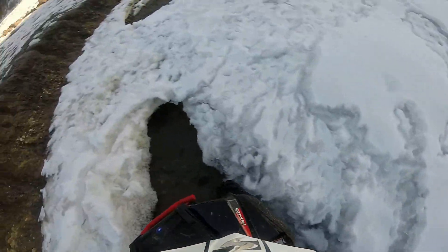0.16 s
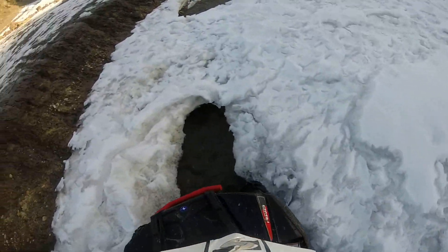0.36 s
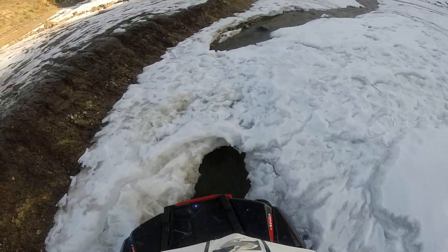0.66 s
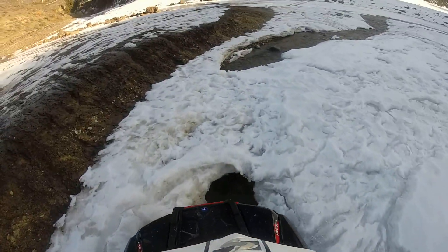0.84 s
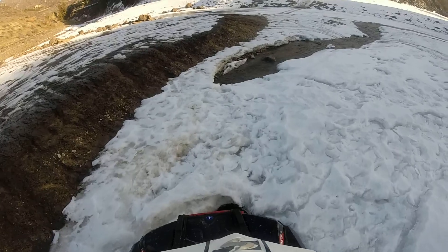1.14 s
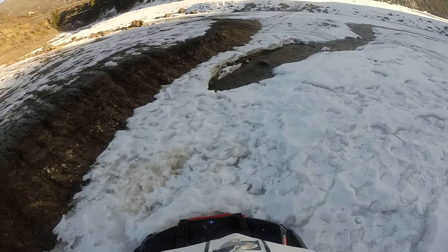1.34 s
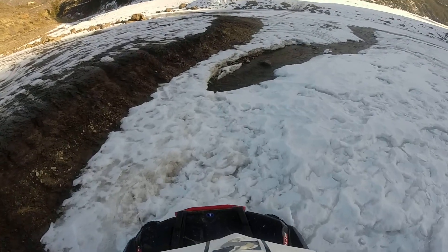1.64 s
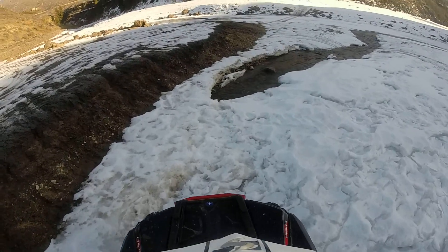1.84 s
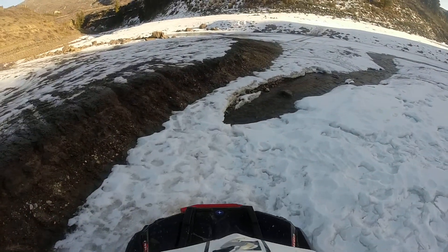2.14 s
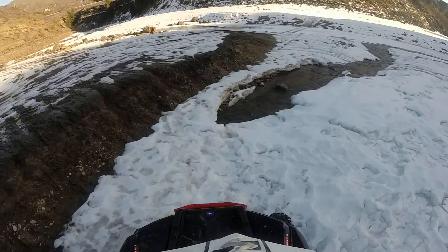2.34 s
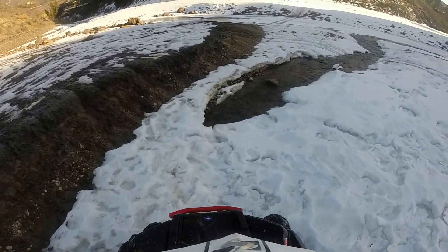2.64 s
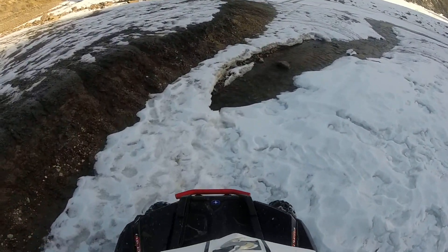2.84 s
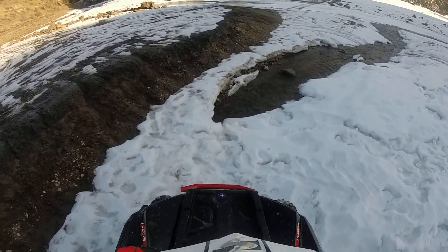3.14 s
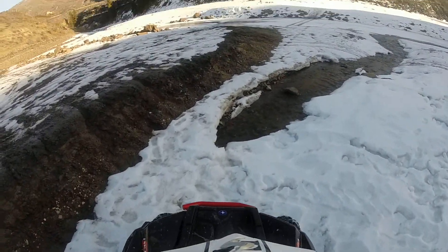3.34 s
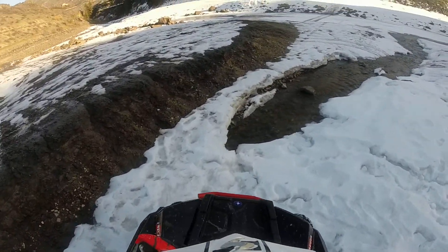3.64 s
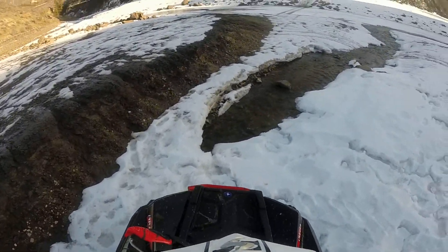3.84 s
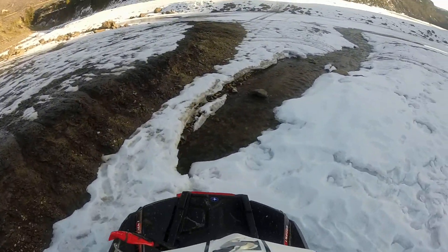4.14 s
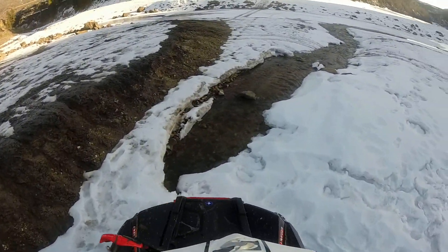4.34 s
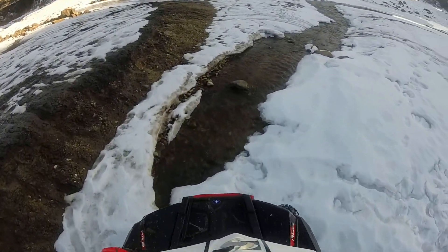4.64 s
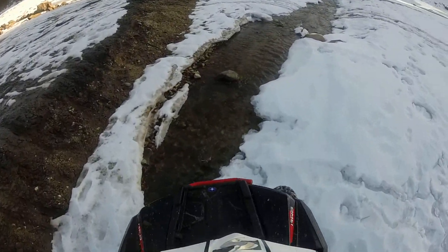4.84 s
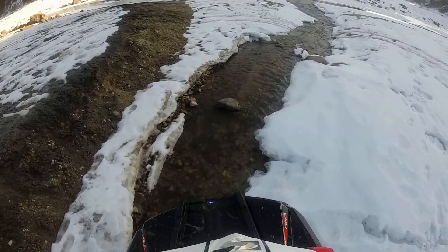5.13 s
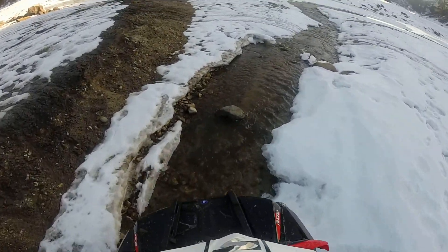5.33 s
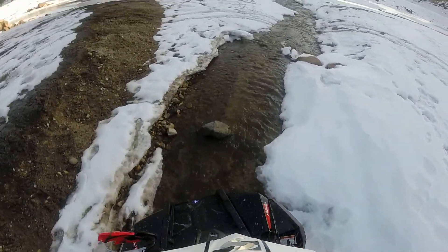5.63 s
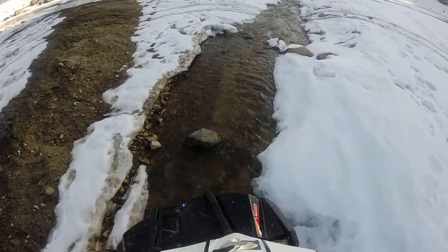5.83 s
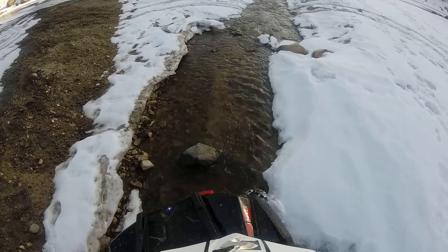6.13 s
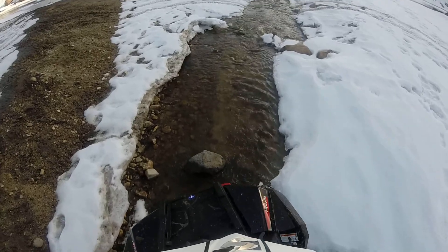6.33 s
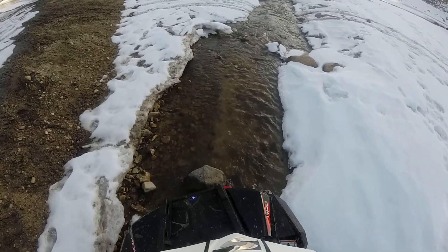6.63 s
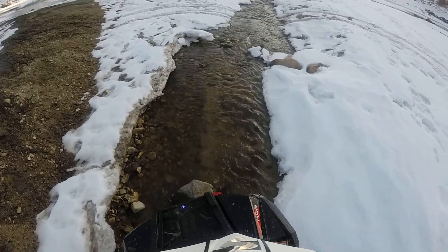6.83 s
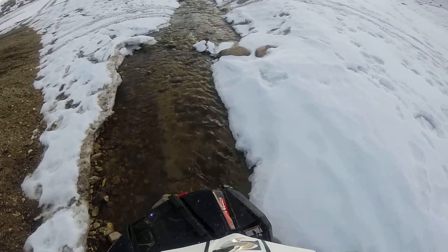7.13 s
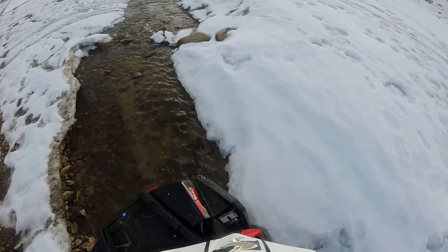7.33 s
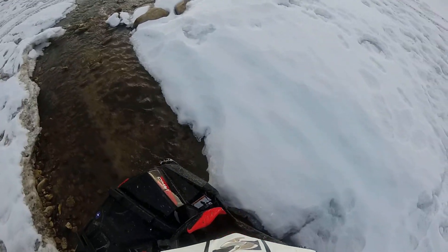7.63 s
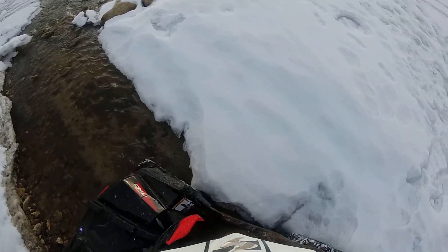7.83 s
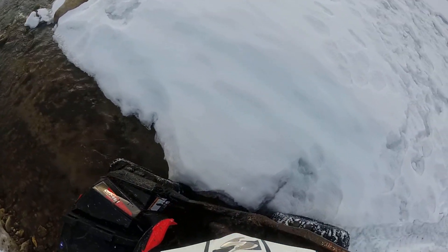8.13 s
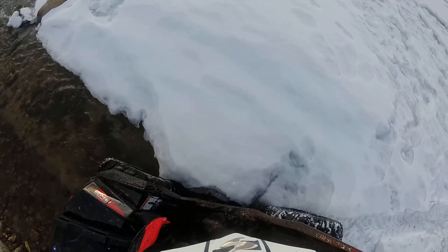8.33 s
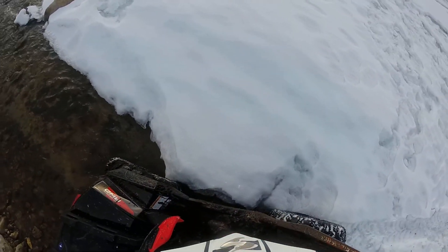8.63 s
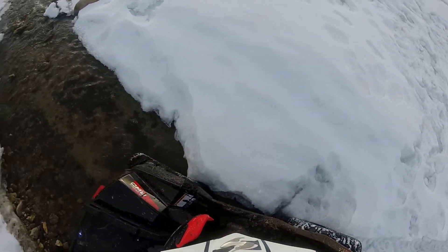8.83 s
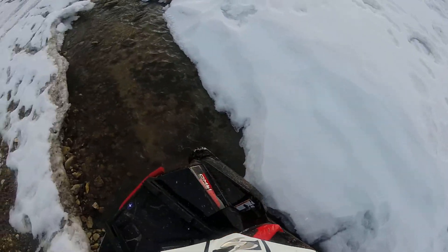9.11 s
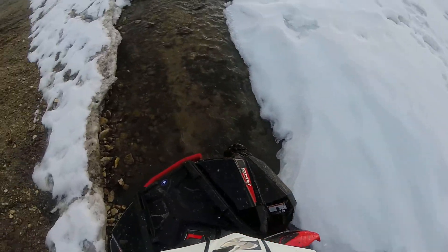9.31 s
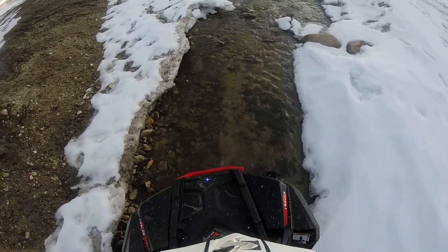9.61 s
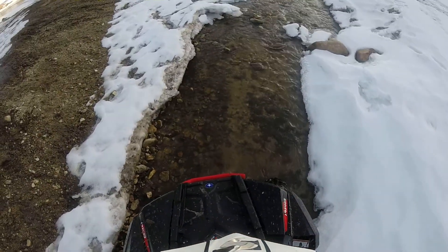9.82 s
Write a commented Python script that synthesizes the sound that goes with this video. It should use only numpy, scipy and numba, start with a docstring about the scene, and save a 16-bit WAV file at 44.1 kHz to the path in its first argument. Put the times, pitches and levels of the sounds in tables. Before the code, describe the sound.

An uneven twin-cylinder quad bike is heard close up through a closed housing, outdoors without echo. Its low growl surges three times, with throbbing hiss and a thin wavering belt whine. Dry ice cracks and small splashes break through. Midway the throttle shuts, dull pops sputter in the exhaust, and it settles to slow chugging. Late, it thumps harder, revs a little and sinks again with brief scrapes and a rattle.

```python
"""The uneven exhaust of a V-twin quad bike is heard first: it surges, idles and speeds up again in an icy creek.
The single microphone is close, on the rider, in a closed housing; each cycle's two firings ring the exhaust.
Gas and valve gear hiss in step, the drive belt sings as a narrow wandering resonance, and fuel pops in the pipe.
Ice cracks ring the housing, water splashes as grainy noise, and slow wind pressure rumbles behind.
Near the end come broad scrapes, made like the splashes, and a short rattle, made like the cracks."""
import sys
import numpy as np
from scipy import signal
from scipy.fft import rfft, irfft
from scipy.io import wavfile
from scipy.ndimage import uniform_filter1d
from numba import njit

SR = 44100
rng = np.random.default_rng(int(sys.argv[2]) if len(sys.argv) > 2 else 0)


def master_out(mix):
    """Clip the mix to full scale and print it as 16-bit PCM to the path in sys.argv[1]."""
    frames = np.transpose(np.atleast_2d(mix))
    ceiling = np.clip(frames, -1, 1)
    pcm = np.round(ceiling * 32767).astype(np.int16)
    wavfile.write(sys.argv[1], SR, pcm)


N = 439677

# Engine speed. Columns: time_s, rate_hz (engine cycles per second)
ENGINE_SPEED = [(0.0, 18.1), (.14, 18.7), (0.3, 18.6), (.53, 21.6), (0.58, 21.9), (.77, 20.4), (.94, 18.8),
                (1.22, 15.7), (1.33, 17.1), (1.55, 22.6), (1.75, 26.5), (1.83, 26.3), (2.17, 21.1),
                (2.44, 19.8), (2.64, 20.6), (2.89, 25.0), (3.19, 28.8), (3.36, 30.7), (3.78, 26.5),
                (3.88, 27), (4.11, 29.3), (4.22, 30.0), (4.55, 29.8), (4.72, 27.5), (4.89, 24),
                (5.08, 21.4), (5.44, 14.1), (5.77, 11.02), (6.19, 9.95), (8.04, 9.83), (8.59, 12.08),
                (9.18, 17.47), (9.97, 13.55)]
# Exhaust levels. Columns: time_s, ring_db, bark_db
EXHAUST_LEVELS = [(0.0, -38, -46.5), (0.22, -41.5, -53), (0.61, -38.5, -48.5), (1.14, -42, -50),
                  (1.28, -39.5, -51), (1.58, -33.5, -45), (2.33, -40, -50.5), (2.89, -35.5, -48),
                  (3.19, -37.5, -47.5), (3.36, -33, -47.5), (3.75, -37.5, -49), (4.44, -33, -45.5),
                  (5.05, -38.5, -57.5), (5.13, -50.5, -57), (5.3, -45, -57.5), (5.45, -48.5, -57),
                  (5.75, -47.5, -56), (6.0, -46.5, -57), (7.11, -45, -62), (7.9, -48, -61),
                  (8.05, -49.5, -59), (8.4, -44.5, -57), (8.86, -41, -54), (9.22, -40, -56),
                  (9.94, -47, -56.5), (9.97, -53, -59)]
# Low exhaust and frame boom, before a random sway. Columns: time_s, level_db
BOOM_LEVEL = [(0, -36.5), (.6, -37), (1.2, -45), (1.35, -34.5), (1.8, -38.5), (3.6, -42), (4.6, -48),
              (5.5, -43.5), (6.3, -42.5), (6.5, -48), (6.75, -41), (7.7, -45.5), (8.1, -40), (9.1, -36.5),
              (9.97, -47.5)]
# Exhaust tone between boom and ring, before GRUNT_TRIM_DB. Columns: time_s, level_db
GRUNT_LEVEL = [(0.0, -41.5), (0.53, -46.5), (2.69, -39.5), (2.86, -50), (4.14, -44), (4.55, -53),
               (4.91, -49), (5.19, -48), (5.33, -42), (5.38, -60), (5.64, -46), (5.72, -60), (6.0, -48),
               (6.13, -60), (6.22, -49), (6.41, -58.5), (7.53, -54.5), (9.5, -46.5), (9.91, -49),
               (9.97, -56)]
# How the engine fires. Columns: time_s, crispness (0-1), tonal_share (exhaust tone in the boom's power, 0-1)
FIRING_CHARACTER = [(0, .45, .55), (.5, .35, .55), (.9, .2, .5), (1.4, .45, .5), (1.8, .25, .5),
                    (2.7, .4, .5), (3, .2, .5), (5.1, .2, .45), (5.4, .25, .45), (6.3, .2, .7),
                    (7.95, .2, .72), (8.1, 1, .94), (8.7, 1, .94), (9.2, .8, .94), (9.5, .4, .8),
                    (9.97, .3, .7)]
# Brief exhaust dips as the engine misses a beat. Columns: centre_s, dip_db
MISSED_BEATS = [(5.19, -2), (5.77, -2), (7.97, -5)]

# Exhaust tone pulling at about 16, 20, 26 and 30 cycles per second.
# Columns: multiple (of the cycle rate), level_db
PULL_AT_16 = [(1, -18.0), (2, -18.0), (3, 0.0), (4, -29.0), (5, -6.0), (6, -14.0), (7, -19.0), (8, -29.0),
              (9, -30.0), (10, -7.0), (11, -8.0), (12, -25.0), (13, -30.0), (14, -19.0), (15, -16.0),
              (16, -34.0), (17, -36.0), (18, -38.0), (19, -22.0), (20, -26.0), (21, -34.0), (22, -26.0),
              (23, -30.0), (24, -32.0), (25, -42.0), (26, -34.0)]
PULL_AT_20 = [(1, -15.0), (2, -3.0), (3, -14.0), (4, -12.0), (5, 0.0), (6, -9.0), (7, -20.0), (8, -1.0),
              (9, -11.0), (10, -7.0), (11, -14.0), (12, -9.0), (13, -5.0), (14, -19.0), (15, -18.0),
              (16, -14.0), (17, -33.0), (18, -15.0), (19, -27.0), (20, -21.0), (21, -18.0), (22, -21.0),
              (23, -26.0), (24, -25.0)]
PULL_AT_26 = [(1, -12.0), (2, -3.0), (3, -6.0), (4, -14.0), (5, -5.0), (6, -3.0), (7, 0.0), (8, -1.0),
              (9, -6.0), (10, -5.0), (11, -10.0), (12, -16.0), (13, -18.0), (14, -19.0), (15, -21.0),
              (16, -12.0), (17, -16.0), (18, -14.0), (19, -35.0), (20, -17.0), (21, -14.0), (22, -21.0)]
PULL_AT_30 = [(1, -23.0), (2, -11.0), (3, -10.0), (4, -28.0), (5, 0.0), (6, -1.0), (7, -3.0), (8, -17.0),
              (9, -15.0), (10, -15.0), (11, -11.0), (12, -19.0), (13, -20.0), (14, -19.0), (15, -21.0),
              (16, -19.0), (17, -21.0), (18, -22.0), (19, -19.0), (20, -28.0), (21, -22.0), (22, -29.0)]
# Exhaust tone idling near 10, reversing near 12 and 17 cycles per second.
# Columns: multiple (of the cycle rate), level_db
IDLE_AT_10 = [(1, -4.0), (2, -19.0), (3, 0.0), (4, -23.0), (5, -3.0), (6, -31.0), (7, -21.0), (8, -11.0),
              (9, -23.0), (10, -31.0), (11, -25.0), (12, -40.0), (13, -15.0), (14, -8.0), (15, -16.0),
              (16, -4.0), (17, -34.0), (18, -17.0), (19, -16.0), (20, -34.0), (21, -14.0), (22, -19.0),
              (23, -30.0), (24, -31.0), (25, -45.0), (26, -39.0), (27, -35.0), (28, -46.0), (29, -39.0),
              (30, -41.0)]
REVERSE_AT_12 = [(1, -15.0), (2, -10.0), (3, 0.0), (4, -16.0), (5, -9.0), (6, -19.0), (7, -23.0),
                 (8, -13.0), (9, -25.0), (10, -24.0), (11, -17.0), (12, -31.0), (13, -11.0), (14, -16.0),
                 (15, -21.0), (16, -37.0), (17, -34.0), (18, -17.0), (19, -23.0), (20, -35.0), (21, -24.0),
                 (22, -26.0), (23, -28.0), (24, -17.0), (25, -25.0), (26, -25.0), (27, -23.0), (28, -49.0),
                 (29, -28.0), (30, -32.0)]
REVERSE_AT_17 = [(1, -17.0), (2, -8.0), (3, 0.0), (4, -24.0), (5, -9.0), (6, -19.0), (7, -29.0), (8, -12.0),
                 (9, -17.0), (10, -9.0), (11, -11.0), (12, -32.0), (13, -18.0), (14, -20.0), (15, -23.0),
                 (16, -23.0), (17, -40.0), (18, -15.0), (19, -22.0), (20, -30.0), (21, -28.0), (22, -44.0),
                 (23, -33.0), (24, -46.0), (25, -48.0), (26, -39.0), (27, -35.0), (28, -49.0), (29, -46.0),
                 (30, -52.0)]

# Exhaust bark resonances. Columns: centre_hz, width_hz, level_db
BARK_MODES = [(284, 88, -1), (411, 113, 0), (557, 127, -0.5), (780, 136, -3.5)]
# Pipe modes rung by hard firings at low speed. Columns: pitch_hz, level_db, t60_s
PIPE_MODES = [(150, 0, .13), (208, -4, .09), (280, -1, .09), (335, -9, .07), (530, -17, .05)]
# Frame resonances. Columns: centre_hz, width_hz, level_db
FRAME_MODES = [(31.3, 12.2, -5.5), (50.8, 12.3, 0.5)]
# Low exhaust rumble. Columns: centre_hz, width_hz, level_db
RUMBLE_MODES = [(85, 61, -9), (196, 89, 1)]
# Overrun pops in the pipe. Columns: start_s, peak_db, pitch_hz
PIPE_POPS = [(5.205, -42, 180), (5.266, -44, 549), (5.29, -39, 189), (5.324, -39.5, 400), (5.438, -41, 476),
             (5.53, -42, 479), (5.545, -45, 160), (5.637, -35.5, 700), (5.644, -39, 500), (5.645, -40, 170),
             (5.709, -39, 170), (5.825, -40, 169), (5.924, -48, 300), (6.088, -50, 304), (6.391, -43, 336)]

# Hiss levels, before flicker and throb. Columns: time_s, machinery_db, chatter_db, top_db
HISS_LEVELS = [(0.0, -44, -46, -55.5), (0.14, -49.5, -52.5, -65), (0.36, -48, -53, -58),
               (0.64, -43.5, -44.5, -54.5), (1.08, -47, -49.5, -58), (1.33, -46.5, -50, -59),
               (1.58, -42, -48.5, -55), (1.86, -41, -46, -56.5), (2.03, -43, -50, -59),
               (2.25, -46, -54, -60.5), (3.25, -41, -48.5, -59.5), (3.72, -43, -51, -60.5),
               (4.36, -41.5, -48, -59), (4.91, -45.5, -52.5, -61.5), (5.14, -50, -55.5, -66.5),
               (5.55, -51, -55.5, -62.5), (5.77, -52.5, -57.5, -69), (6.4, -54.5, -59.5, -71),
               (7.08, -55, -60.5, -71.5), (8.02, -54, -57.5, -71.5), (8.8, -49.5, -51, -65),
               (9.05, -49, -50.5, -67), (9.97, -52.5, -59.5, -70)]
# Treble let in by the housing, widths before BAND_WIDENING. Columns: centre_hz, width_hz, level_db
HOUSING_MODES = [(1070, 118, -10), (1428, 80, -11), (1652, 275, -5), (1848, 77, -8), (2162, 114, -1),
                 (2404, 79, -0.5), (2860, 446, -10), (3430, 150, -15)]
# Valve gear, widths before BAND_WIDENING. Columns: centre_hz, width_hz, level_db
VALVE_MODES = [(4265, 320, 5.5), (4800, 510, -2.5), (5570, 490, -5)]
# Colour of the highest treble. Columns: frequency_hz, density_db (level per Hz)
TOP_COLOUR = [(5000, -30), (6000, 0), (7200, -5), (8400, -14), (10500, -13), (12000, -19), (15300, -21)]
# Drive belt song, before a random sway. Columns: time_s, level_db, pitch_hz
BELT_SONG = [(0, -77, 1546), (0.44, -57, 1555), (0.5, -54, 1540), (0.89, -45, 1558), (1.05, -51, 1548),
             (1.22, -60, 1526), (1.55, -47.5, 1540), (1.68, -35.5, 1555), (1.75, -46, 1555),
             (1.9, -48, 1585), (2.0, -38, 1565), (2.11, -47.5, 1560), (2.24, -50, 1553),
             (2.28, -48.5, 1550), (2.56, -54.5, 1555), (2.9, -58, 1557), (2.98, -42, 1560),
             (3.44, -48.5, 1566), (3.5, -37.5, 1558), (3.55, -46.5, 1554), (3.72, -44, 1582),
             (3.9, -49, 1551), (4.02, -41, 1568), (4.4, -35, 1567), (4.69, -35, 1584), (4.85, -46, 1573),
             (5.02, -46.5, 1560), (5.12, -44, 1562), (5.18, -49, 1580), (5.27, -56.5, 1574),
             (5.33, -68, 1580), (6.1, -80, 1570)]

# Ice cracks, and a short rattle at the end (last three rows).
# Columns: start_s, peak_db, thud_db, snap_db (thud and snap relative to the crack)
CRACKS_AND_RATTLE = [(0.4777, -34, -6, -20), (0.551, -41, -13, -20), (1.8295, -21.5, -25, -20),
                     (1.915, -28, -24, -20), (2.519, -20, -13.5, -11), (3.559, -23.5, -21, -13),
                     (4.0742, -29, -21, -18), (6.5162, -22.5, -18, -14), (7.645, -32.5, -11, -24),
                     (7.908, -25.5, -16, -24), (9.3124, -26, -17, -12), (9.845, -41, -18, -20),
                     (9.903, -32, -7, -20), (9.9244, -41, -14, -20)]
# Crack resonances, each passed twice. Columns: centre_hz, width_hz (of one pass), level_db
ICE_MODES = [(2170, 600, 0), (3300, 600, -12)]
# Splashes, and broad scrapes near the end (9.797 and 9.889 s).
# Columns: start_s, peak_db (of the envelope), top_db (relative to the peak), fade_s (to -60 dB)
SPLASHES_AND_SCRAPES = [(0.3482, -41, 4, 0.035), (0.4388, -31.5, -19, 0.081), (1.3886, -33, -17, 0.26),
                        (5.8994, -42, -22, 0.076), (6.215, -29.5, -16, 0.12), (6.2485, -40, -22, 0.08),
                        (6.2991, -44, -18, 0.13), (6.3894, -43.5, -20, 0.12), (7.3396, -39, -25, 0.071),
                        (9.3546, -35, -22, 0.064), (9.6085, -31.5, -29, 0.056), (9.634, -43, -22, 0.04),
                        (9.797, -30.5, -29, 0.054), (9.817, -46, -10, 0.04), (9.889, -32, -23, 0.052),
                        (9.916, -43, -27, 0.076)]
# Spray through the housing. Columns: centre_hz, width_hz, level_db
SPRAY_MODES = [(2170, 360, 3.5), (3370, 340, -3.5), (4570, 610, 0), (7340, 2400, -16)]
# Wind on the housing, before a random sway. Columns: time_s, level_db
WIND_LEVEL = [(0.0, -50), (0.5, -37), (2.33, -40.5), (2.66, -25.5), (2.75, -36.5), (3.33, -28),
              (5.08, -37.5), (6.33, -32.5), (6.38, -40), (9.27, -51), (9.36, -29), (9.97, -47.5)]

REAR_LAG, START_PHASE = 270 / 720, .39  # both in engine cycles
RELEASE_S, REOPEN_S = 5.25, 8.0  # the throttle shuts, then opens again
LOADED_S, LIGHT_RATE = 2.6, 21.5  # until the wheels bite, surges keep the tone of this speed (cycles per s)
IDLE_LATE_S = .019  # idling, the ring above 135 Hz leaves the silencer late
MISSED_BEAT_S = 0.056  # time constant of a dip
THUMP_DB, GRUNT_TRIM_DB = 0.5, -0.5  # thump relative to the exhaust ring; offset on the grunt level
STEP_DB, STEP_S = -4, .004  # pressure step beside the pipe modes, its fade constant
THROB_DB = 3.0  # throb scale per standard deviation of puff at full crispness; the hiss body swells by 0.75 and the top by 0.87 of it, in dB
BAND_WIDENING = 1.9  # widens each of two filter passes in the hiss
BELT_WIDTH_HZ = 42
CRACK_RING_S = .008  # fade to -60 dB of the noise striking the crack modes
TOP_HZ = 15250  # upper limit of the recorder


def undb(db):
    """Decibels to gain."""
    return 10 ** (np.asarray(db) / 20)


def unit(x):
    """Scale to rms 1."""
    return x / np.sqrt(np.mean(x ** 2))


def curves(table):
    """Columns of a timed table, one value per sample."""
    s, *columns = np.transpose(table)
    return [np.interp(np.arange(N) / SR, s, c) for c in columns]


def walk(rate):
    """Random levels every 1 / rate s, joined by lines; spread near 1."""
    knots = rng.standard_normal(int(N / SR * rate) + 2)
    return np.interp(np.arange(N) * (rate / SR), np.arange(len(knots)), knots)


@njit
def svf(x, hz, width):
    """State-variable band-pass, gain 1 at the centre."""
    y, band, low = np.empty(len(x)), 0., 0.
    g, k = np.tan(np.pi * hz / SR), width / hz
    for i in range(len(x)):
        v = (band + g * (x[i] - low)) / (1 + g * (g + k))
        band, low, y[i] = 2 * v - band, low + 2 * g * v, k * v
    return y


def svf_twice(x, hz, width, second_width):
    """Two band-passes in a row give steeper skirts."""
    return svf(svf(x, float(hz), float(width)), float(hz), float(second_width))


def resonate(x, modes):
    """Parallel resonances of alternating sign."""
    return sum((-1) ** k * undb(db) * svf(x, float(hz), float(w)) for k, (hz, w, db) in enumerate(modes))


def firings(cycles, scatter_db=1.0):
    """Pulses of both cylinders, and a gas envelope that swells at each firing and fades."""
    pulses = np.full(N, 1e-18)
    for lag in (0, REAR_LAG):
        cycle = np.arange(1, int(cycles[-1] - lag))
        at = np.interp(cycle + lag, cycles, np.arange(N)).astype(int)
        pulses[at] += undb(scatter_db * rng.standard_normal(400)[cycle])
    fade = np.exp(-1 / (.016 * SR))  # 16 ms time constant
    puff = uniform_filter1d(signal.lfilter([1], [1, -fade], pulses), SR // 250)
    return pulses, puff - uniform_filter1d(puff, SR // 5)


def exhaust(rate, cycles, pulses, puff):
    """Firings drive pipe tone, gas bark and thumps; frame drumming and a low exhaust rumble add noise."""
    ring_db, bark_db = curves(EXHAUST_LEVELS)
    boom_db = curves(BOOM_LEVEL)[0] + 1.5 * walk(5.7)
    grunt_db = curves(GRUNT_LEVEL)[0] + GRUNT_TRIM_DB
    crisp, tonal = curves(FIRING_CHARACTER)
    t = np.arange(N) / SR
    dip_db = sum(db * np.exp(-((t - s) / MISSED_BEAT_S) ** 2) for s, db in MISSED_BEATS)

    # the upper multiples follow the bark
    boom, grunt, ring = tone(rate, cycles, np.clip(bark_db - ring_db + 12, -10, 0))
    gas = unit(undb(4 * crisp * puff / puff.std()) * rng.standard_normal(N))
    kicks = unit((pulses - pulses.mean()) / np.sqrt(rate))
    bark = unit(resonate(.45 * crisp * kicks + (1 - .5 * crisp) * gas, BARK_MODES))

    hard = np.clip(4 * crisp - 3, 0, 1)  # only the crispest firings thump
    ring = np.sqrt(1 - hard) * ring + np.sqrt(hard) * undb(THUMP_DB) * thump(kicks)
    drum = unit(resonate(rng.standard_normal(N), FRAME_MODES))
    rumble = unit(resonate(rng.standard_normal(N), RUMBLE_MODES))
    ring = ring + undb(-15) * rumble
    low = undb(boom_db) * (np.sqrt(tonal) * boom + np.sqrt(1 - tonal) * drum)
    low = low + undb(grunt_db) * grunt
    return undb(dip_db) * (undb(ring_db) * ring + undb(bark_db) * bark + low)


def order_db(k, rate, speeds, tables):
    """Level of multiple k, read between the steady speeds."""
    levels = [t[k - 1][1] if k <= len(t) else -50 for t in tables]
    return np.interp(rate, speeds, levels)


def tone(rate, cycles, upper_db, step=32):
    """Multiples of the cycle rate, phased as firings three quarters of a turn apart: boom, grunt and ring."""
    rate, cycles = rate[::step], cycles[::step]
    t = np.arange(len(rate)) * step / SR
    after_release = np.clip((t - RELEASE_S) / 0.069, 0, 1)
    idle = after_release * np.clip(11.2 - rate, 0, 1)
    reversing = after_release - idle  # any speed above idle after the release
    closed = after_release * (t < REOPEN_S)
    early = t < LOADED_S
    upper_db = upper_db[::step] - 4 * early - 6 * closed  # light load dulls the upper multiples
    pull_rate = np.where(early, np.minimum(rate, LIGHT_RATE), rate)

    out, power = 0, 1e-12
    for k in range(1, 31):
        hz = k * rate
        pull = order_db(k, pull_rate, [16, 20, 26, 30], [PULL_AT_16, PULL_AT_20, PULL_AT_26, PULL_AT_30])
        later = order_db(k, rate, [9.9, 11.6, 17], [IDLE_AT_10, REVERSE_AT_12, REVERSE_AT_17])
        level_db = pull + after_release * (later - pull) + 1.2 * walk(9)[::step]
        size = undb(level_db + upper_db * np.clip(hz / 40 - 6.5 + closed, 0, 1))
        pair = np.angle(1 + np.exp(-2j * np.pi * k * REAR_LAG))
        # pressure steps up at each firing; the pipe rings on near 170 Hz, which arrives late
        lag = 4.3 + 2 * np.arctan((hz - 170) / 40)
        lag = lag + 2 * np.pi * IDLE_LATE_S * idle * np.maximum(hz - 135, 0)
        # above idle, the silencer adds its own ring near 195 Hz
        lag = lag + reversing * (np.pi + 2 * np.arctan((hz - 195) / 15))
        # crossovers: boom to grunt from 62 Hz, grunt to ring from 120 Hz
        high, higher = (np.clip((hz - edge) / 12, 0, 1) for edge in (62, 120))
        lag = lag - .5 * reversing * (1 - high)  # shifts the boom's peak against the step
        parts = size * np.array([1 - high, high - higher, higher])
        wander = .015 * k * walk(10)[::step]
        out = out + parts * np.cos(2 * np.pi * k * cycles + pair - lag + wander)
        power = power + parts ** 2 / 2 * (hz < 280)
    # level each part by its power below 280 Hz, then let it sway
    out = out / np.sqrt(uniform_filter1d(power, 100)) * undb(1.2 * walk(30)[::step])
    return signal.resample_poly(out, step, 1, axis=1)[:, :N]


def thump(kicks):
    """Each hard firing steps the pressure up and rings the pipe."""
    t = np.arange(SR // 5) / SR
    ring = sum(undb(db - 60 * t / t60) * np.sin(2 * np.pi * hz * t) for hz, db, t60 in PIPE_MODES)
    step = undb(STEP_DB) * np.exp(-t / STEP_S) * np.minimum(t / .001, 1)
    return unit(signal.fftconvolve(kicks, ring + step - step.mean())[:N])


def pops():
    """Unburnt fuel pops dully in the pipe as the engine winds down: fading noise through one resonance."""
    out = np.zeros(N)
    t = np.arange(SR // 20) / SR
    for (s, db, hz), noise in zip(PIPE_POPS, rng.standard_normal((len(PIPE_POPS), len(t)))):
        pop = svf_twice(noise * undb(-60 * t / .06), hz, .6 * hz, .8 * hz)
        out[int(s * SR):][:len(t)] += undb(db) * pop / np.abs(pop).max()
    return out


def machinery(puff):
    """Gas and valve gear as a hiss that throbs with the firings and flickers."""
    hiss_db, chatter_db, top_db = curves(HISS_LEVELS)
    throb = THROB_DB * curves(FIRING_CHARACTER)[0] * puff / puff.std()
    hiss = undb(hiss_db) * flickering(HOUSING_MODES)
    chatter = undb(chatter_db) * flickering(VALVE_MODES)
    body = undb(.75 * throb) * (hiss + chatter)
    top = undb(top_db + 0.87 * throb + 1.5 * walk(21)) * top_noise()
    return undb(0.13 * walk(60) + 0.56 * walk(12)) * (body + top)


def flickering(modes):
    """Steep noise bands, each flickering on its own."""
    out = 0
    for hz, width, db in modes:
        wide = BAND_WIDENING * width
        flicker_db = 1.0 * walk(14) + 1.44 * walk(120)
        out = out + undb(db + flicker_db) * svf_twice(rng.standard_normal(N), hz, wide, wide)
    return unit(out)


def top_noise():
    """Noise with the colour of the highest octave and a half."""
    hz, db = np.transpose(TOP_COLOUR)
    f = np.fft.rfftfreq(N, 1 / SR)
    colour = undb(np.interp(np.log(f + 1), np.log(hz), db, left=-90))
    return unit(irfft(rfft(rng.standard_normal(N)) * colour, N))


def belt():
    """The loaded belt rubs a narrow, wandering cover resonance into a rough, sustained song."""
    db, hz = curves(BELT_SONG)
    slow = signal.butter(3, BELT_WIDTH_HZ / 2, fs=SR, output="sos")
    rub = signal.sosfilt(slow, rng.standard_normal(N) + 1j * rng.standard_normal(N))
    # rubbing that feeds itself holds a steadier strength than chance alone
    rub = rub / (1e-9 + np.abs(rub)) ** .25
    carrier = np.exp(2j * np.pi * np.cumsum(hz) / SR)
    return undb(db + 2.2 * walk(35)) * unit((rub * carrier).real)


def cracks_and_rattle():
    """Dry ice cracks ring the housing, each with a bright snap and a duller thud; so does the late rattle."""
    out = np.zeros(N + SR)
    t = np.arange(SR // 20) / SR

    def knock(noise, fade_s, modes):
        """Fading noise rings the modes, scaled to peak 1."""
        strike = noise * undb(-60 * t / fade_s)
        ring = sum(undb(db) * svf_twice(strike, hz, w, w) for hz, w, db in modes)
        return ring / np.abs(ring).max()

    noises = rng.standard_normal((len(CRACKS_AND_RATTLE), 3, len(t)))
    for (s, db, thud_db, snap_db), noise in zip(CRACKS_AND_RATTLE, noises):
        crack = knock(noise[0], CRACK_RING_S, ICE_MODES)
        thud = knock(noise[1], 0.046, [(794, 550, 0)])
        snap = knock(noise[2], 0.0085, [(5640, 1300, 0)])
        out[int(s * SR):][:len(t)] += undb(db) * (crack + undb(thud_db) * thud + undb(snap_db) * snap)
    return out[:N]


def bursts(table, column_db):
    """Envelope of sudden onsets, each fading by 60 dB in its own time."""
    out = np.zeros(N)
    for (start_s, _, _, fade_s), db in zip(table, column_db):
        i = int(start_s * SR)
        t = np.arange(min(int(fade_s * SR), N - i)) / SR
        out[i:i + len(t)] += undb(db - 60 * t / fade_s) * np.minimum(t / .004, 1)  # 4 ms rise
    return out


def splashes_and_scrapes():
    """Splashes as grainy spray through the housing; the late broad scrapes use the same noise."""
    rows = np.array(SPLASHES_AND_SCRAPES)
    peak_db, top_db = rows[:, 1], rows[:, 2]
    spray = unit(resonate(rng.standard_normal(N), SPRAY_MODES))
    grain = undb(3 * walk(200) - 6)
    return grain * (spray * bursts(rows, peak_db) + top_noise() * bursts(rows, peak_db + top_db))


def wind():
    """Slow pressure swings on the housing, with a tail into the bass."""
    db, = curves(WIND_LEVEL)
    push = resonate(rng.standard_normal(N), [(7, 4.95, -0.5), (18, 11.8, -13.0)])  # Hz, width Hz, dB
    return undb(db + 2.5 * walk(6.6)) * unit(push)


def scene():
    """Everything sums at one microphone in the open, with no echo."""
    rate, = curves(ENGINE_SPEED)
    cycles = START_PHASE + np.cumsum(rate) / SR
    pulses, puff = firings(cycles)
    engine = exhaust(rate, cycles, pulses, puff) + pops() + machinery(puff) + belt()
    return (engine + cracks_and_rattle() + splashes_and_scrapes() + wind())[None]


def record(dry):
    """The recorder cuts the top with a steep low-pass."""
    return signal.sosfilt(signal.ellip(10, .2, 80, TOP_HZ, fs=SR, output="sos"), dry)


dry = scene()
out = record(dry)
master_out(out)
```